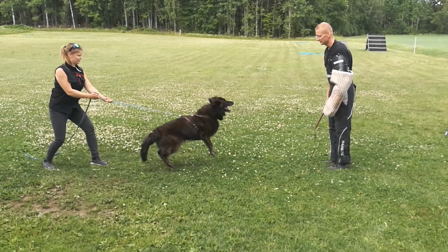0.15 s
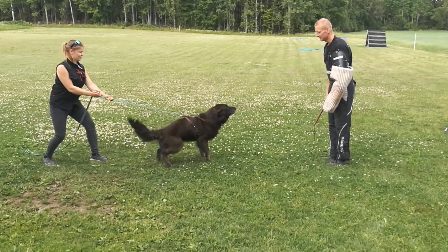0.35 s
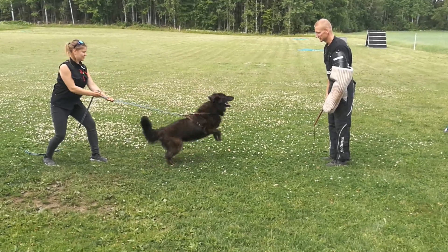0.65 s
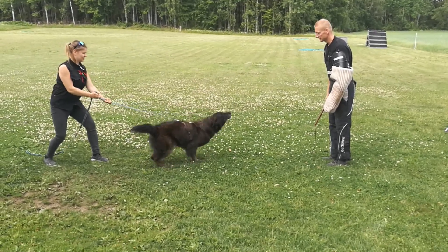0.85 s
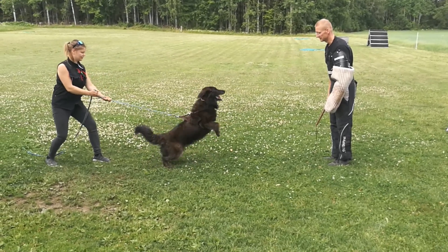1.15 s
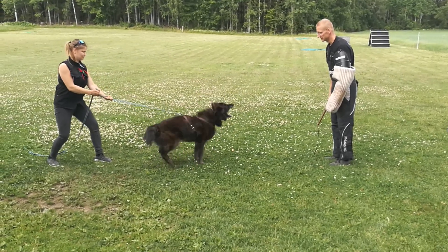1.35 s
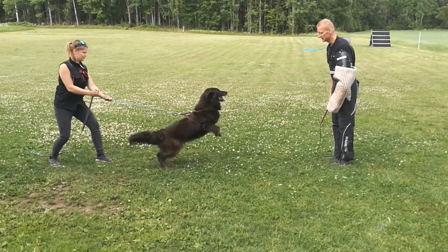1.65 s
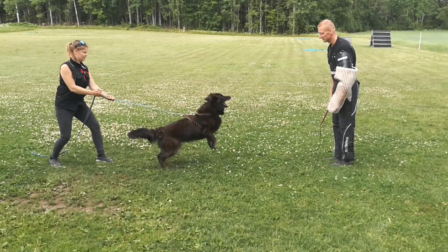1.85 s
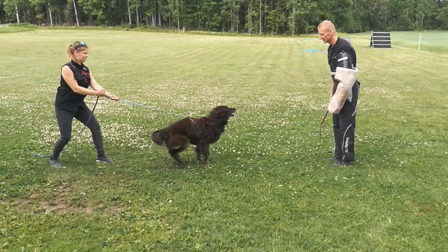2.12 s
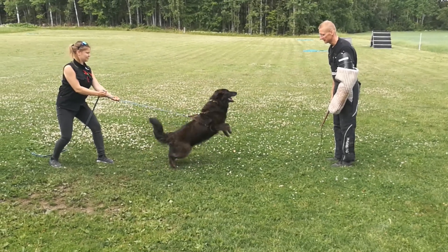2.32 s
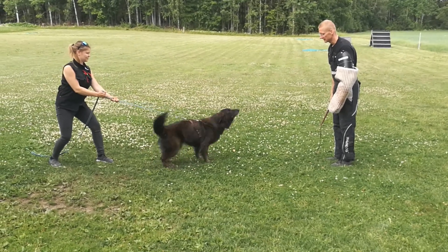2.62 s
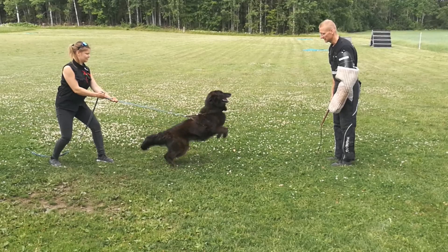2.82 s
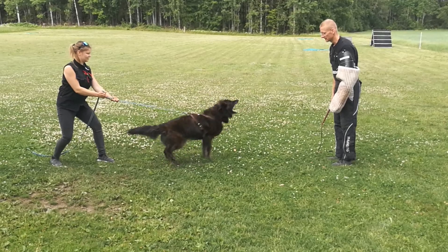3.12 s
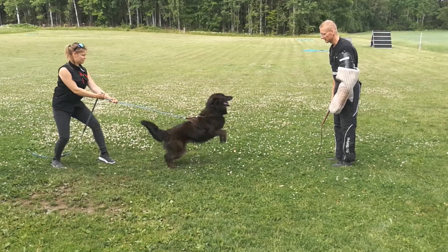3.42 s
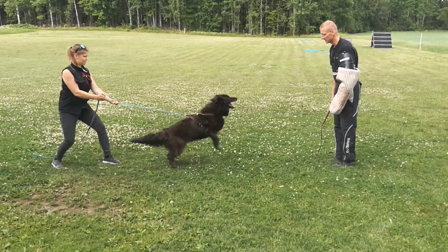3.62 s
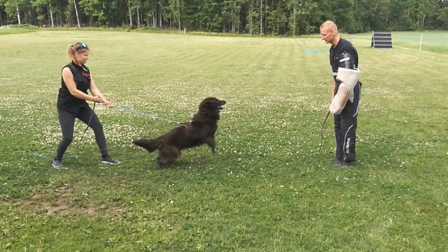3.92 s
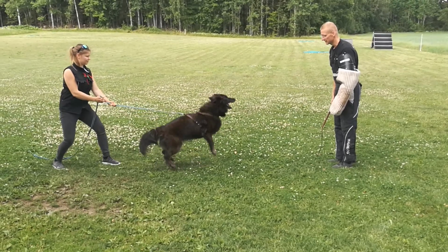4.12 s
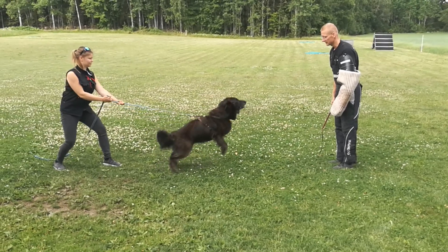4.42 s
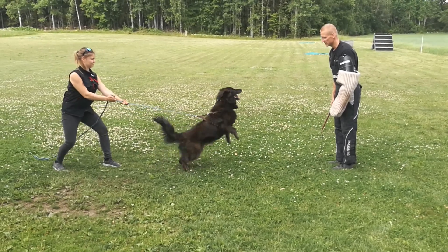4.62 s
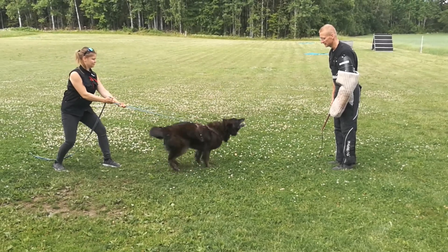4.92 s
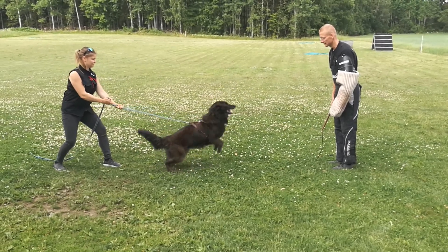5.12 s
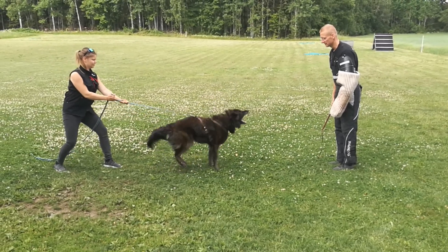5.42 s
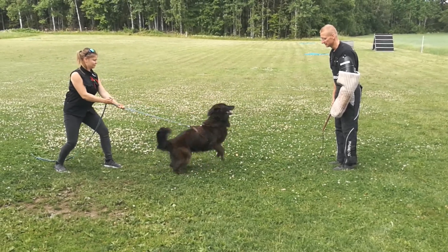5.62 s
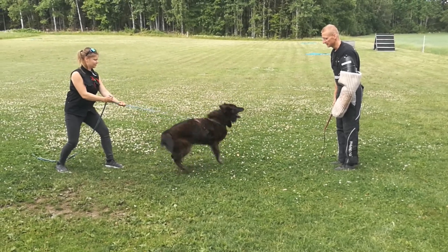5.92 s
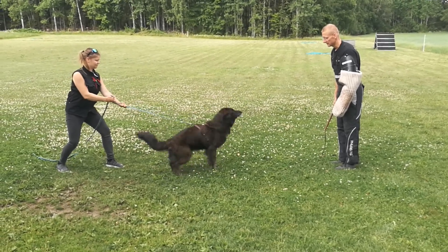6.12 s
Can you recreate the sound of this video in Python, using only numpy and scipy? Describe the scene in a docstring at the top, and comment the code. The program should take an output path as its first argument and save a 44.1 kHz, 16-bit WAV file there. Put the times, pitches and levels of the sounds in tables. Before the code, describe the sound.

A large dog barks throughout on an open grass field. Eleven single barks fall at about 0.2, 0.8, 1.4, 1.9, 2.5, 3.1, 3.7, 4.3, 4.9, 5.4 and 6.0 seconds, very regular but slightly different in force and tone. Each lasts under a fifth of a second: a rough, raspy catch, a clear yelp arching up and down around 600 hertz, then a turbulent huff of air. In the gaps are faint breathy pants and short soft crunches and thuds of paws on grass, such as near 1.0, 1.7, 2.2, 3.4, 4.0 and 5.7. A leash clip clinks very faintly around 4.45 and 5.15. Low, soft wind thumps touch the microphone, most noticeably in the first second, over a barely audible breeze and hush. Short diffuse reflections and a dull, weak echo from the trees follow the barks. The barking continues to the end, around 6.3.

```python
"""Leashed dog barking on a mown field

A large dog barks eleven times; each bark is a pitch arch of seven harmonics through throat and jaw resonances.
The folds start roughly, a clear yelp follows as the jaw resonance sinks, then a huff of turbulent air.
Between barks: pants (swelling noise), paws on grass (decaying noise) and leash clinks (decaying modes).
Around it: low gusts and short soft thumps at the microphone, a faint breeze and hush (all shaped noise),
short diffuse scatter and dull echoes from the forest edge."""
import sys
import numpy as np
from scipy import signal
from scipy.fft import rfft, irfft, next_fast_len
from scipy.io import wavfile
from scipy.ndimage import uniform_filter1d

SR = 44100
rng = np.random.default_rng(int(sys.argv[2]) if len(sys.argv) > 2 else 0)


def transcribe(signal):
    """Save signal, clipped to [-1, 1], as a 16-bit WAV file at the path in sys.argv[1]."""
    frames = np.atleast_2d(signal).T
    limited = np.clip(frames, -1, 1)
    pcm = np.round(limited * 32767).astype(np.int16)
    wavfile.write(sys.argv[1], SR, pcm)


N = 276066

# hiss of air at the teeth: (frequency [Hz], relative density [dB])
HISS_COLOUR = [(1760, -28.5), (3000, -1), (3190, -6.5), (3440, -15.5), (3670, -15.5), (4360, -9.5),
               (4730, -11.5), (6030, -11), (6550, -13), (8880, -19), (9650, -17), (10400, -22.5),
               (13900, -28.5), (15600, -27.5)]
OPPOSED = np.array([[1], [-1]])  # opposite signs left and right


def gain_of(db):
    """Decibels to amplitude gain."""
    return 10 ** (np.asarray(db) / 20)


def evened(x):
    """Scales to rms 1."""
    return x / np.sqrt(np.mean(x ** 2) + 1e-20)


def read(points, hz, axis=1):
    """Interpolates one table column on a log-frequency axis."""
    table = np.array(points)
    return np.interp(np.log(hz + 1), np.log(table[:, 0] + 1), table[:, axis])


def add(mix, start_s, sound):
    """Mixes a sound in at a time, cropping what falls outside."""
    at = round(start_s * SR)
    sound = sound[..., max(-at, 0):]
    part = mix[..., max(at, 0):][..., :sound.shape[-1]]
    part += sound[..., :part.shape[-1]]


def noise(colour, size):
    """Gaussian noise of rms 1 with a given spectrum."""
    n = next_fast_len(size)
    spectrum = rfft(rng.standard_normal(n))
    shaped = spectrum * gain_of(read(colour, np.fft.rfftfreq(n, 1 / SR)))
    return evened(irfft(shaped, n)[:size])


def flutter(hz, size):
    """Random wavering of rms 1, up to about a given rate."""
    return noise([(hz / 2, 0), (hz, -3), (2 * hz, -20), (10 * hz, -90)], size)


def field(level_db=-77.5, apart=.6):
    """Very faint outdoor hush: steady coloured noise, partly different at each port."""
    # (frequency [Hz], relative density [dB])
    colour = [(59, -33), (100, -3), (846, -10.5), (1700, -5), (2760, -17), (15600, -44.5)]
    return gain_of(level_db) * (noise(colour, N) + apart * OPPOSED * noise(colour, N))


def wind(breeze_db=-78, apart=.2):
    """Low gusts and short soft thumps at the microphone over a faint breeze, nearly alike at both ports."""
    # (time [s], level [dB], half length to 1/e of power [s])
    gusts_and_thumps = [(0.14, -50.5, 0.012), (0.256, -52.5, .1), (0.91, -70, 1), (0.993, -51, 0.018),
                        (1.691, -56.5, .14), (2.262, -56.5, 0.0094), (2.675, -58.5, 0.019),
                        (3.264, -54, .015), (3.89, -63, 0.017), (4.539, -67.5, 0.011), (5.049, -77, .2),
                        (5.834, -57, .08), (6.157, -60.5, 0.048)]
    # (frequency [Hz], relative density [dB])
    colour = [(15, -6), (30, -3.5), (65, 1), (120, -4), (200, -9), (300, -30), (800, -48.5), (3000, -61.5)]
    t = np.arange(N) / SR
    power = gain_of(breeze_db) ** 2
    for s, db, half_s in gusts_and_thumps:
        power = power + gain_of(db) ** 2 * np.exp(-((t - s) / half_s) ** 2)
    return np.sqrt(power) * (noise(colour, N) + apart * OPPOSED * noise(colour, N))


def forest(x):
    """Distant things and the trees send back dull, smeared echoes."""
    # (delay [s], level [dB], smear [s])
    echoes = [(0.107, -32.5, 0.01), (0.291, -56.5, .06)]
    t = np.arange(SR) / SR
    colour = [(300, -7), (600, -7.0), (1200, 6.5), (2200, 1.5), (10000, -12.5)]  # Hz, dB
    returns = np.zeros((2, SR))
    for delay_s, db, smear_s in echoes:
        echo = np.array([noise(colour, SR), noise(colour, SR)]) * np.exp(-abs(t - delay_s) / smear_s)
        # level refers to the mean response from 500 to 2000 Hz
        returns += gain_of(db) * echo / np.sqrt(np.mean(abs(rfft(echo))[:, 500:2000] ** 2))
    return signal.fftconvolve(x[None], returns, axes=1)[:, :N]


def scatter(x, build_s=0.013, longest_t60_s=1 / 4):
    """Short diffuse returns from the ground and things nearby, different at each port, die fast."""
    # (frequency [Hz], level [dB], decay time before the cap [s])
    returns = [(150, -18, 0.067), (600, -18.5, 1), (1250, -7, 0.051), (2292, -3, 0.1), (4500, -3.5, 0.018),
               (15000, 1.5, 0.18)]
    hz, t, z = signal.stft(rng.standard_normal((2, SR // 2)), SR, nperseg=256)
    t60 = np.minimum(read(returns, hz, axis=2), longest_t60_s)[:, None]
    level_db = read(returns, hz)[:, None] - 60 * t / t60
    z *= gain_of(level_db) * np.sqrt(2 * np.log(1000) / (t60 * SR))  # level independent of t60
    tails = signal.istft(z * np.clip(t / build_s, 0, 1), SR, nperseg=256)[1]
    return signal.fftconvolve(x[None], tails, axes=1)[:, :N]


def ports(x):
    """Direct sound reaches two microphone ports with level and phase differing by frequency."""
    # (frequency [Hz], left minus right [dB])
    balance = [(60, -4), (92, -2), (140, -7), (210, 1.5), (330, 0), (500, 0), (770, -5), (1170, -3.5),
               (1790, -1.5), (2740, -10), (4190, 0.5), (6410, 4.5), (9810, 6.5), (15000, -6)]
    # (frequency [Hz], left leads by [rad])
    lead = [(100, 0), (600, -0.7), (1200, -0.64), (1800, -0.55), (2150, -.7), (2600, -0.83), (3500, -0.087),
            (4600, 1.6), (6000, -1.4), (8000, 0), (11000, -1), (15000, 1)]
    hz = np.fft.rfftfreq(N, 1 / SR)
    left = gain_of(read(balance, hz) / 2) * np.exp(.5j * read(lead, hz))
    pair = np.array([left, 1 / left])
    return irfft(rfft(x) * pair / abs(pair.mean(0)), N)


def clink(s, peak_db, level_db=5.0):
    """The metal clip of the leash rings briefly in a few decaying modes."""
    # (frequency [Hz], level [dB], decay time t60 [s])
    modes = [(7760, -7, 0.027), (8200, -6, 0.022), (10900, -4, .03)]
    t = np.arange(4096) / SR
    ring = sum(gain_of(db - 60 * t / t60) * np.sin(2 * np.pi * hz * t) for hz, db, t60 in modes)
    return s, gain_of(peak_db + level_db) * ring / abs(ring).max()


def paw(s, crunch_db, thud_db, crunch_trim_db=-4.5, thud_trim_db=4.5, crunch_s=0.0048, thud_s=0.018):
    """A paw crushes the grass and thuds on the turf: two noise bursts with separate decays."""
    # crushed grass: (frequency [Hz], relative density [dB])
    grass = [(200, -17), (600, 8.5), (1100, -10.5), (1800, 9), (2900, -6), (3600, -7), (5000, -20),
             (6500, -16), (10000, -26.5), (15000, -37)]
    # thud on turf: (frequency [Hz], relative density [dB])
    turf = [(40, -9.5), (110, -3.5), (220, 0), (500, -12), (1200, -39.5), (4000, -69)]
    t = np.arange(12000) / SR
    crunch = gain_of(crunch_db + crunch_trim_db) * noise(grass, len(t)) * np.exp(-t / crunch_s)
    thud = gain_of(thud_db + thud_trim_db) * noise(turf, len(t)) * np.exp(-t / thud_s)
    return s, (crunch + thud) * (1 - np.exp(-t / 0.00091))


def pant(s, db, length_s=0.19, level_db=-1.5, flutter_db=3.0, skew=.85, sharpness=1.1):
    """The dog draws air through its open mouth: a quick swell and a slower ebb."""
    # (frequency [Hz], relative density [dB])
    colour = [(240, -34.5), (400, -4), (531, -11), (829, -20.5), (1170, 1.5), (1370, -13), (1620, -2.5),
              (2210, -6), (2770, -19.5), (3510, -12.5), (4800, -36.5), (6090, -27.5), (7610, -34.5),
              (8570, -28), (14000, -45)]
    t = np.arange(0, length_s, 1 / SR)
    swell = abs(np.sin(np.pi * (t / length_s) ** skew)) ** sharpness
    gain = gain_of(db + level_db + flutter_db * flutter(50, len(t)))
    return s, swell * gain * noise(colour, len(t))


def shove(s, level_db=-57.5, attack_s=.004, decay_s=0.064):
    """The first shove of air from the chest is a soft low puff."""
    t = np.arange(12000) / SR
    colour = [(50, -14.5), (120, -4.5), (190, 1.5), (300, -10), (600, -32), (3000, -75)]  # Hz, dB
    envelope = np.exp(-t / decay_s) * (1 - np.exp(-t / attack_s))
    return s, gain_of(level_db) * noise(colour, len(t)) * envelope


def huff(s, db, length_s=.175, level_db=2.5, fall_db_per_s=115.5, dull_db_per_s=14.5,
         burst=2.5, burst_s=0.014, patchy_db=2.5, attack_s=0.0099, fade_s=.045):
    """The remaining air rushes out of the open mouth in a turbulent puff that dulls as it dies."""
    # (frequency [Hz], relative density [dB])
    colour = [(100, -13.5), (300, -15), (450, -8), (620, -5), (850, -11.5), (1300, -0.5), (2000, -3.5),
              (2800, -7.5), (4200, -12), (5500, -19.5), (9000, -19.5), (12000, -31.5), (15700, -37)]
    t = np.arange(0, length_s, 1 / SR)
    hz, frame_s, z = signal.stft(noise(colour, len(t)), SR, nperseg=256)
    # turbulence: random patches in time and frequency
    blur = np.outer(np.hanning(7), np.hanning(9))
    patches = evened(signal.fftconvolve(rng.standard_normal(z.shape), blur, "same"))
    dulling_db = dull_db_per_s * np.outer(np.log2(1 + hz / 3000), frame_s)
    air = signal.istft(z * gain_of(patchy_db * patches - dulling_db), nperseg=256)[1][:len(t)]
    fall = gain_of(db + level_db - fall_db_per_s * t) * (1 + burst * np.exp(-t / burst_s))
    ends = np.clip(t / attack_s, 0, 1) * np.clip((t[-1] - t) / fade_s, 0, 1)
    return s, air * fall * ends


def gesture(t, swell_s, release_s, top_hz, open_hz, half_hz, closing_s):
    """Stage, pitch and jaw resonance about t = 0: the pitch arches while the jaw closes in two moves."""
    scoop, scoop_bend = 0.43, 1.66  # share below the top at the start, power of the curve
    drop, drop_bend = .383, 1.72  # the same at the release
    # slight upward bend of the harmonics as the jaw resonance sweeps down, as a share
    upbend, upbend_s = 0.025, .012
    shut_hz, shut_s = 204, 0.058  # the resonance sinks towards this as the mouth shuts
    stage = np.where(t < 0, t / swell_s, t / release_s)
    sag = np.where(t < 0, scoop * abs(stage) ** scoop_bend, drop * abs(stage) ** drop_bend)
    bend = upbend * np.exp(-(t / upbend_s) ** 2)
    pitch = top_hz * np.maximum(1 - sag + bend, .4)
    closing = open_hz + (half_hz - open_hz) * np.exp(-(t / closing_s) ** 2)
    shutting = shut_hz + (half_hz - shut_hz) * np.exp(-(t / shut_s) ** 2)
    return stage, pitch, np.where(t < 0, closing, shutting)


def bark(s, lead_s, swell_s, release_s, top_hz, effort_db, push_db, linger_db, bright_db,
         open_hz, half_hz, closing_s, start_db, rasp_db, hiss_db,
         jitter=.035, shimmer_db=8.0, flicker_db=2.23, half_beat=0.45, jaw_q=6.5,
         puff_depth=.27, rise_s=0.018, cycle_memory=0.59, fade_s=0.018, hiss_width=0.42, bloom_s=0.036):
    """Air starts to flow, the folds catch, and their harmonics pass the throat and the moving jaw."""
    # course of every bark: (stage: -1 folds caught, 0 loudest, 1 release; effort [dB],
    # brightness [dB/octave], rasp [dB], hiss [dB], roughness of the folds [0-1])
    course = [(-1.084, -25.5, -15, -1, -56, 0.53), (-0.75, -13, -1, 2, -47.5, .35),
              (-0.24, -4.5, -0.5, -8.5, -45.5, 0.092), (0, -2.5, -7.5, 2.5, -43.5, .02),
              (0.26, -7.5, 5, -2, -46.5, .1), (0.3, -23, 7, -4.5, -55, 0.21),
              (0.67, -29.5, 2, -9, -53.5, .5), (0.9, -38, -12, -15, -62, 0.42)]
    # throat: (frequency [Hz], gain [dB])
    throat = [(300, -34), (380, -16), (470, -4), (620, 1), (780, 6), (950, -3), (1150, -2), (1450, 2.5),
              (1800, 6.5), (2300, 3.5), (2700, -12), (3200, -13), (4200, -20)]
    # rasp: (frequency [Hz], relative density [dB])
    rasp_colour = [(60, -34.5), (320, -36), (430, -18), (600, 3), (800, 0), (950, -9.5), (1250, 4),
                   (1800, -5.5), (2400, -8.5), (2750, -18), (3100, -31.5), (3500, -35), (6000, -41),
                   (12000, -44)]
    t = np.arange(-lead_s, release_s + fade_s, 1 / SR)
    n = len(t)
    stage, pitch, jaw = gesture(t, swell_s, release_s, top_hz, open_hz, half_hz, closing_s)
    stages, *columns = np.transpose(course)
    curves = [uniform_filter1d(np.interp(stage, stages, c), size=130) for c in columns]
    effort, bright, rasp, hiss, rough = curves
    effort = effort + effort_db + push_db * np.clip(-stage, 0, 1) + linger_db * np.clip(stage / 0.28, 0, 1)
    caught = np.clip(1 + (t + swell_s) / rise_s, 0, 1) ** 2

    # the folds beat unevenly as they start and stop
    phase = 2 * np.pi * np.cumsum(pitch * (1 + jitter * rough * flutter(160, n))) / SR
    # strong and weak beats alternate, which puts lines between the overtones
    alternation = half_beat * rough * np.cos(phase / 2 + flutter(36, n))
    voice = np.zeros(n)
    for k in range(1, 8):
        hz = k * pitch
        jaw_gain = 1 / (1 - (hz / jaw) ** 2 + 1j * hz / jaw / jaw_q)
        octaves = np.log2(np.maximum(hz, 550) / 1000)
        shimmer = shimmer_db * rough * (flutter(73, n) - .5)
        flicker = flicker_db * np.log(k) * flutter(24, n)
        level_db = effort + read(throat, hz) + (bright + bright_db) * octaves + shimmer + flicker
        tone = (jaw_gain * np.exp(1j * k * phase)).real
        voice += caught * gain_of(level_db) * tone * (1 + (k > 1) * alternation)

    rasp_gain = (1 - caught) * gain_of(start_db) + caught * gain_of(rasp + rasp_db)
    # hiss at the teeth builds with the flow and escapes in one puff a cycle
    flow = np.clip((t + lead_s) / (lead_s - swell_s + bloom_s), 0, 1) ** 2
    puffs = evened(1 + puff_depth * np.cos(phase))
    hiss_gain = flow * puffs * gain_of(hiss + hiss_db + 0.85 * flutter(90, n))
    air = rasp_gain * noise(rasp_colour, n) + hiss_gain * noise(HISS_COLOUR, n)
    # each cycle partly repeats the last ones, so the noise gathers around the harmonics
    repeat = np.clip(cycle_memory, 0, 1) * caught
    repeated = sum(repeat ** k * np.interp(t - k / pitch, t, air, left=0) for k in range(3))
    air = repeated / np.sqrt(1 + repeat ** 2 + repeat ** 4)
    wide = hiss_width * hiss_gain * noise(HISS_COLOUR, n) * OPPOSED
    ends = np.clip((t + lead_s) / 0.033, 0, 1) * np.clip((t[-1] - t) / fade_s, 0, 1)
    return s - lead_s, (voice + air + wide) * ends


def scene(huff_width=0.43):
    """The dog heard directly and by its returns, with the wind and the hush."""
    # (loudest moment [s], air before it [s], voiced rise [s], release [s], arch top [Hz], effort [dB],
    # extra push at the start [dB], the same in the release [dB], brightness [dB/octave],
    # jaw resonance wide open [Hz], the same at the loudest moment [Hz], time constant between them [s],
    # first air [dB], rasp [dB], hiss [dB], huff delay [s], huff before trim [dB], left minus right [dB])
    barks = [ (.238, .120, .083, 0.074, 624, -18.5, -2, 0, -0.5, 1230, 1001, .028, -40.5, -32, -0.5, 0.058, -50.5, 0.8),
             (0.804, .097, .076, .076, 622, -22, -4, 0.5, -1.2, 1466, 950, .013, -38.5, -29.5, 0.5, .07, -49.5, 0.8),
             (1.375, .092, .074, .07, 609.5, -18, -2, 0, 0.5, 1251, 853, 0.019, -42, -28.5, 1, .052, -46.5, 0.1),
             (1.937, .094, .073, .074, 581.2, -23, 1, 0, -4.5, 1212, 1033, .028, -36, -29, 0, .047, -47.5, 1),
             (2.54, .121, .086, 0.068, 650.2, -19.5, -1, -0.5, -2, 1299, 920, .011, -40, -32, 0, .062, -48, 0.34),
             (3.121, .095, .077, .076, 611.2, -20.5, 0, -1, -1.5, 1213, 850, .012, -48.5, -29, 0, .052, -45, 0.5),
             (3.702, .090, .076, .072, 598.4, -20, -0.5, 0.5, 0.5, 1268, 860, 0.02, -37, -30.5, -0.5, 0.052, -47.5, -0.4),
             (4.281, .118, 0.093, .07, 614.7, -26, 6, 0.5, 0, 1367, 1184, .012, -43, -32.5, -0.5, 0.057, -52, 0.6),
             (4.883, .107, .083, 0.091, 624.7, -21, -2.3, -3, -1.5, 1358, 930, .027, -37, -29.5, -1.5, 0.045, -45, 1.2),
             (5.438, .109, .081, .068, 611.4, -20, -1.5, 2, -0.8, 1296, 930, 0.016, -41.5, -30.5, 0, 0.065, -50, 0.7),
             (6.01, .113, .078, .074, 604.6, -21, 4, 2.5, 2.5, 1226, 845, 0.019, -34.5, -31.5, 1.5, 0.053, -47, 1)]
    # (start [s], level before trim [dB])
    pants = [(-.11, -58.5), (.45, -61.5), (1.028, -57.5), (1.6, -62), (2.13, -64.5), (2.76, -64.5),
             (3.35, -61), (3.94, -63), (4.539, -69), (5.09, -61.5), (5.659, -59), (6.21, -65)]
    # landings and scuffs: (time [s], crunch before trim [dB], thud before trim [dB])
    paws = [(0.5414, -49.5, -66.5), (0.5838, -46, -66.5), (0.9712, -42, -66), (1.1176, -53, -62),
            (1.6707, -47.5, -59), (1.7548, -66.5, -65.5), (2.2222, -43, -62), (2.8344, -56, -69.5),
            (2.8744, -56.5, -77.5), (3.4251, -47, -63), (3.4694, -59.5, -73.5), (3.5182, -53, -66),
            (4.0058, -45, -61), (4.0475, -50, -64), (4.0898, -55, -70), (4.649, -47, -64),
            (5.1723, -45, -65), (5.215, -50, -64), (5.7395, -39.5, -57), (5.8184, -47.5, -59.5)]
    # leash clip: (time [s], peak before trim [dB])
    clinks = [(4.452, -60), (5.1605, -64)]
    dog, spread = np.zeros((2, N)), np.zeros(N)
    for s, *voice, huff_delay_s, huff_db, pan_db in barks:
        start_s, sound = bark(s, *voice)
        add(dog, start_s, sound * gain_of([[pan_db / 2], [-pan_db / 2]]))
        add(dog, *shove(start_s))
        add(dog, *huff(s + huff_delay_s, huff_db))
        add(spread, *huff(s + huff_delay_s, huff_db))  # the huff sounds wider than the voice
    for source, rows in ((pant, pants), (paw, paws), (clink, clinks)):
        for row in rows:
            add(dog, *source(*row))
    middle = dog.mean(0)
    direct = ports(dog) + huff_width * np.array([spread, -spread])
    return direct + scatter(middle) + forest(middle) + wind() + field()


def record(dry, edge_hz=15800):
    """The recorder's band limit: a linear-phase low-pass."""
    lowpass = signal.firwin(511, edge_hz, window=("kaiser", 9), fs=SR)
    return signal.oaconvolve(dry, lowpass[None], "same")


dry = scene()
out = record(dry)
transcribe(out)
```